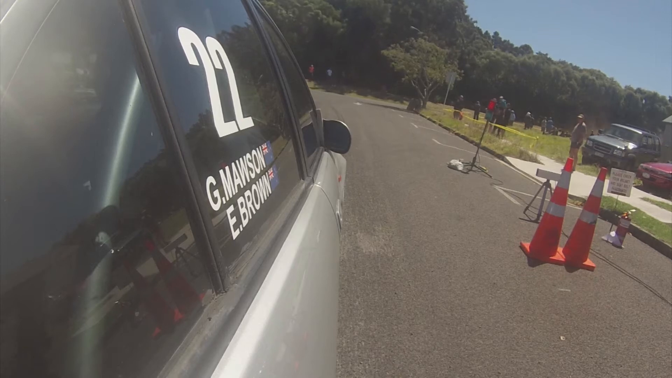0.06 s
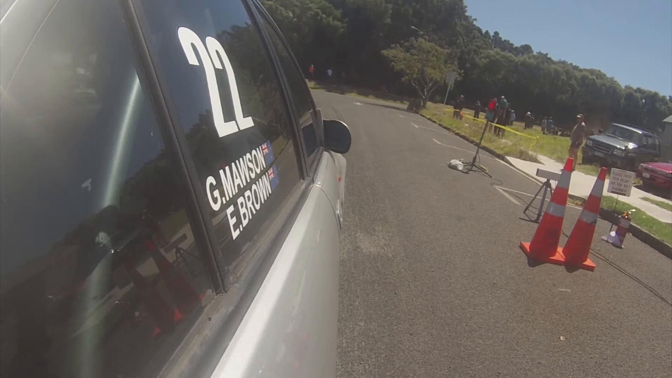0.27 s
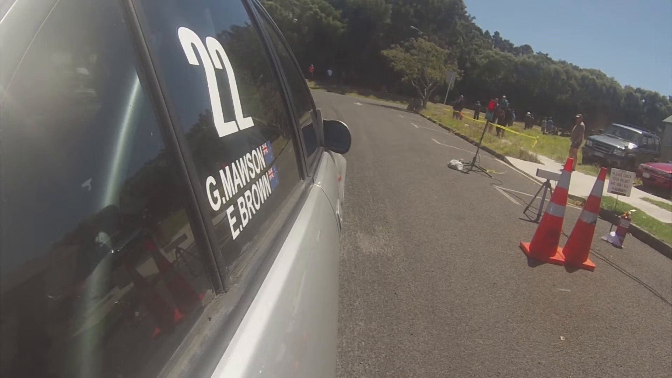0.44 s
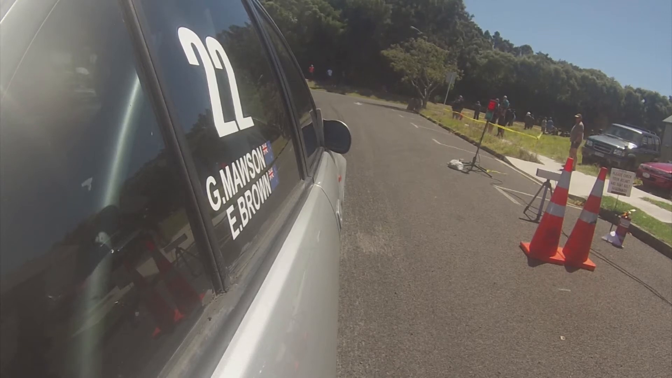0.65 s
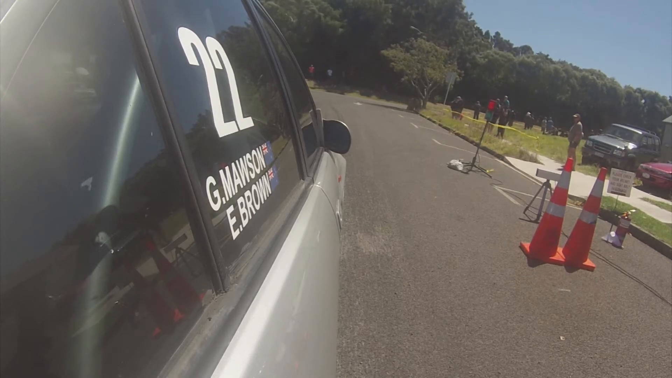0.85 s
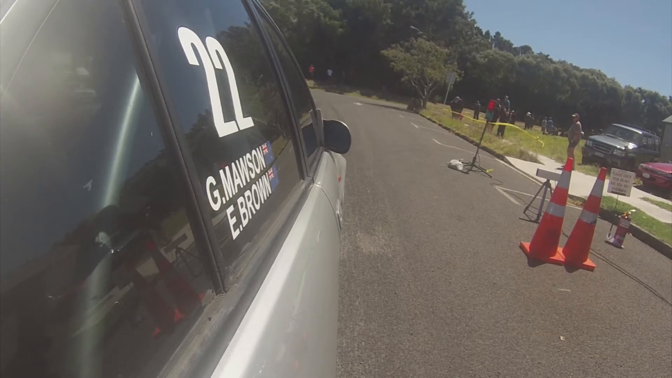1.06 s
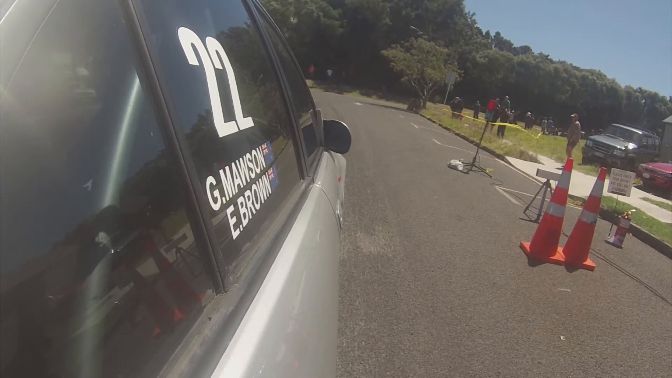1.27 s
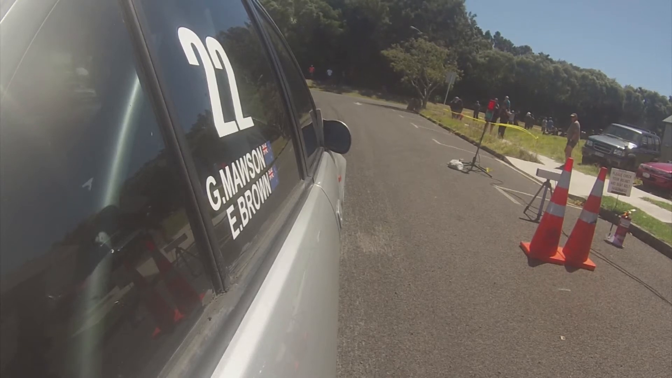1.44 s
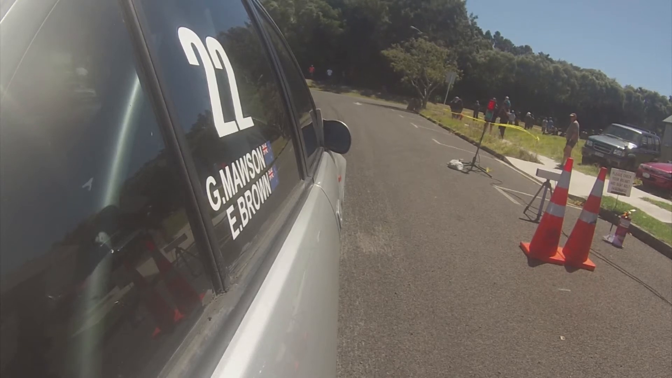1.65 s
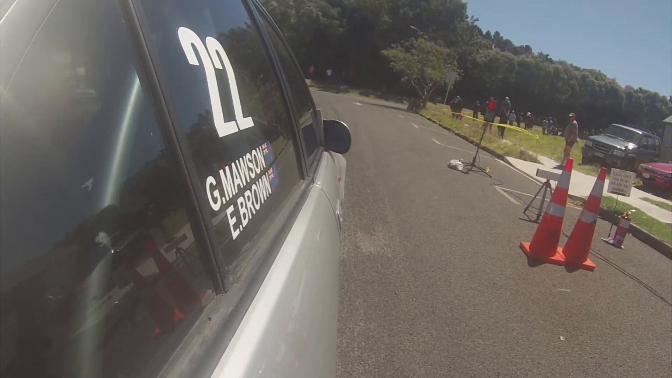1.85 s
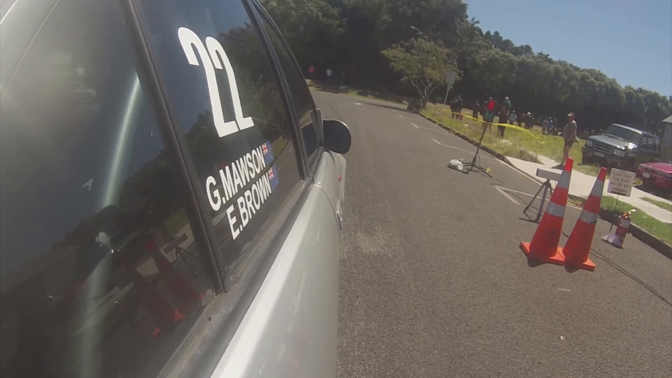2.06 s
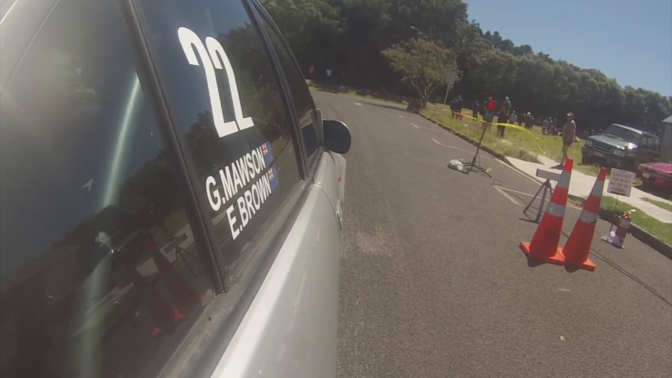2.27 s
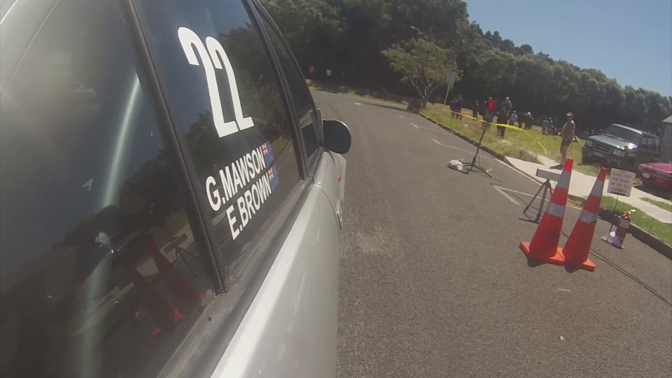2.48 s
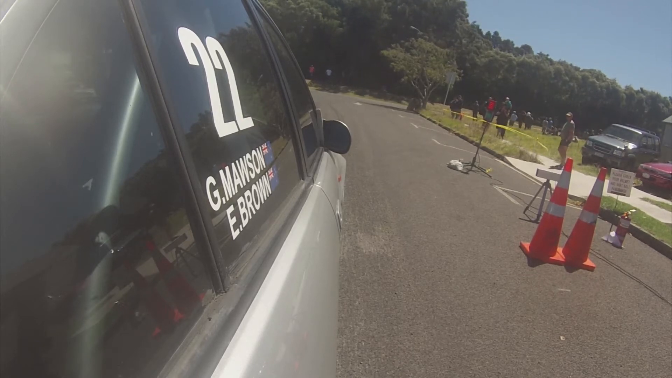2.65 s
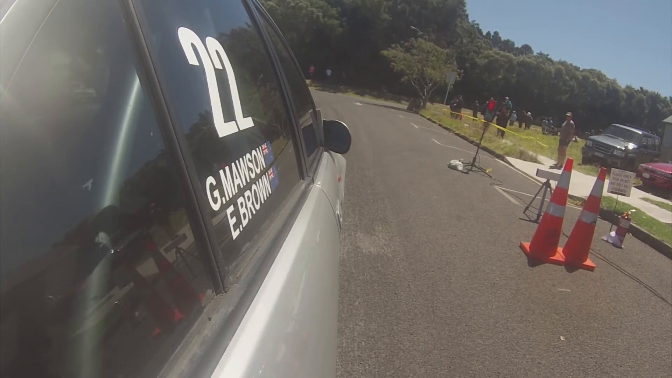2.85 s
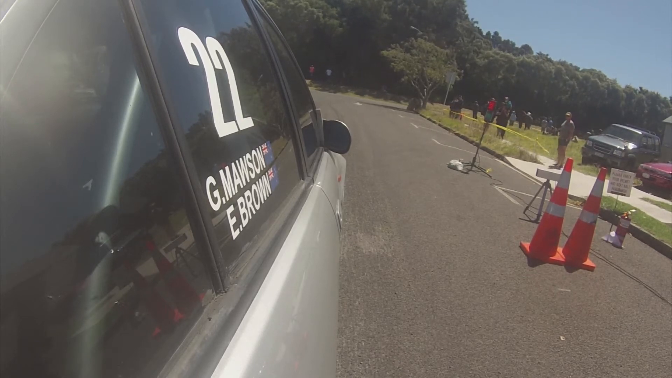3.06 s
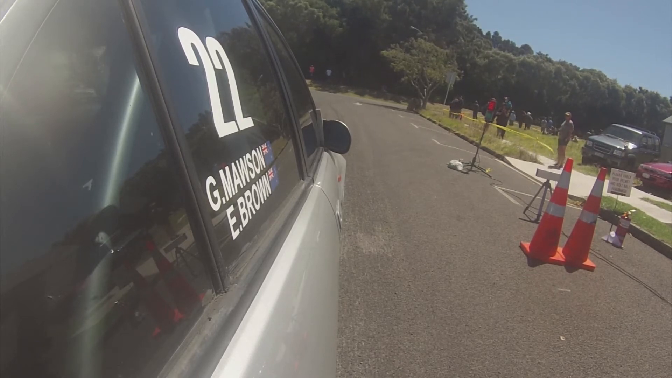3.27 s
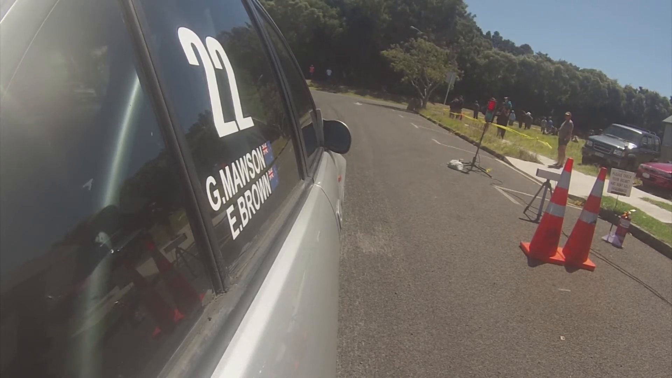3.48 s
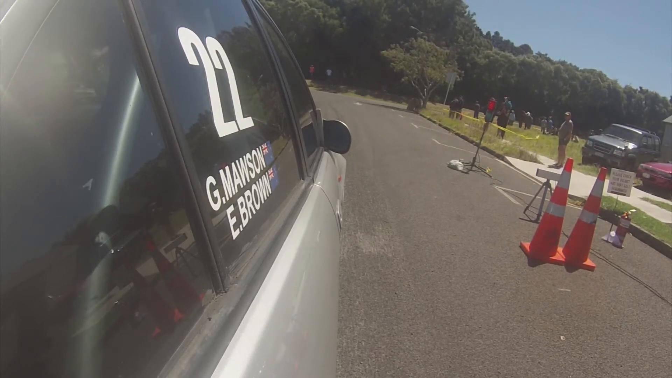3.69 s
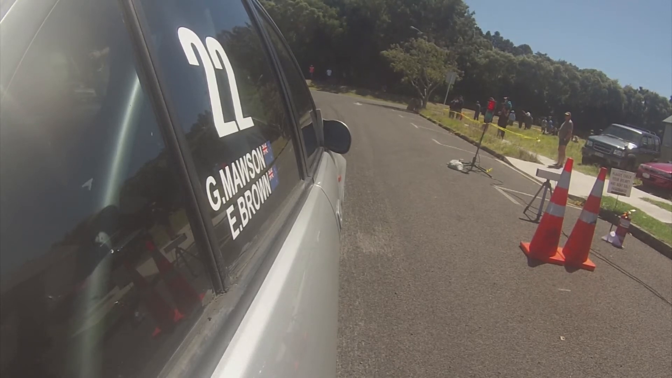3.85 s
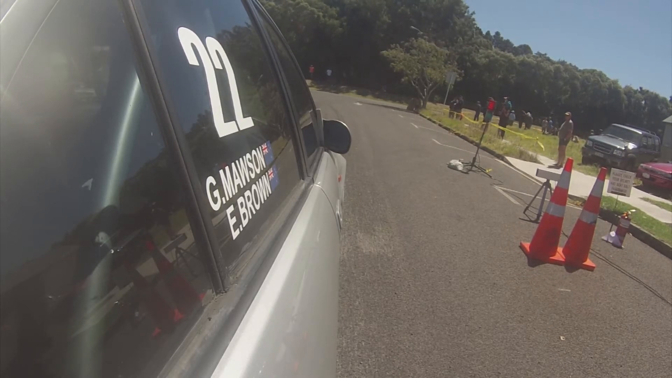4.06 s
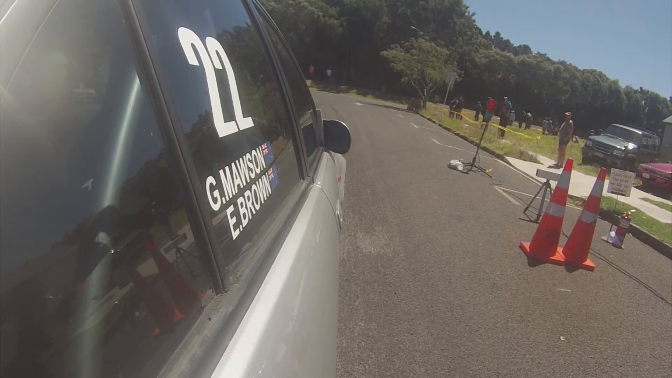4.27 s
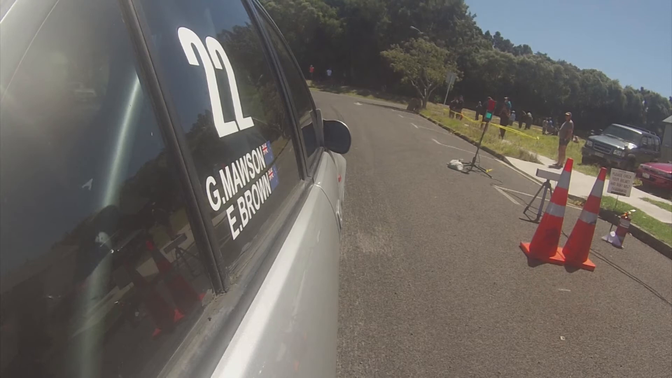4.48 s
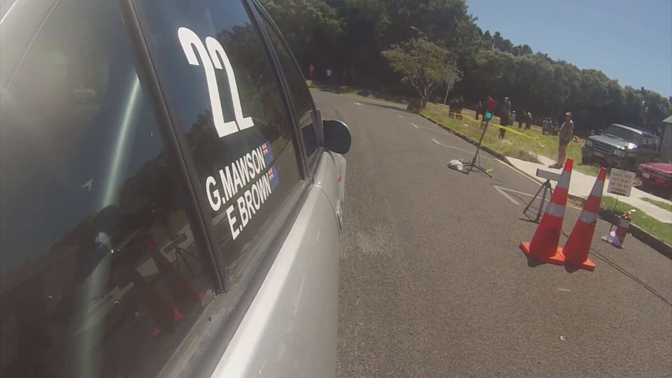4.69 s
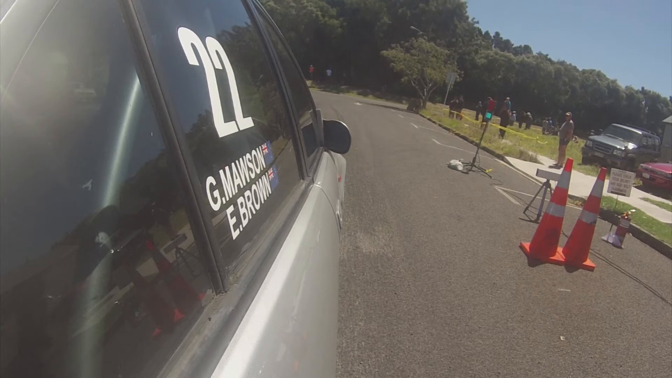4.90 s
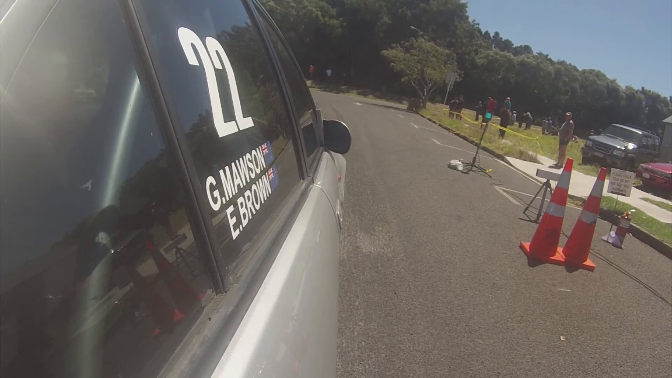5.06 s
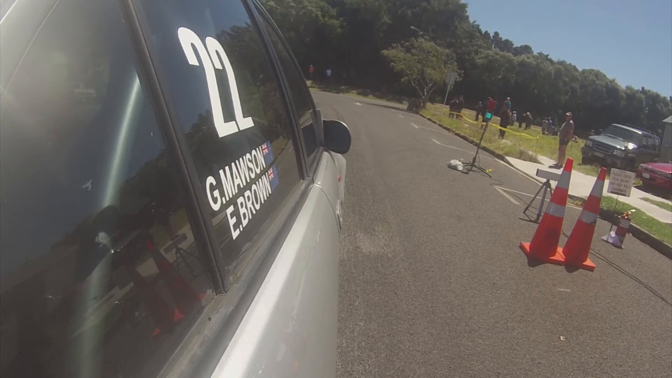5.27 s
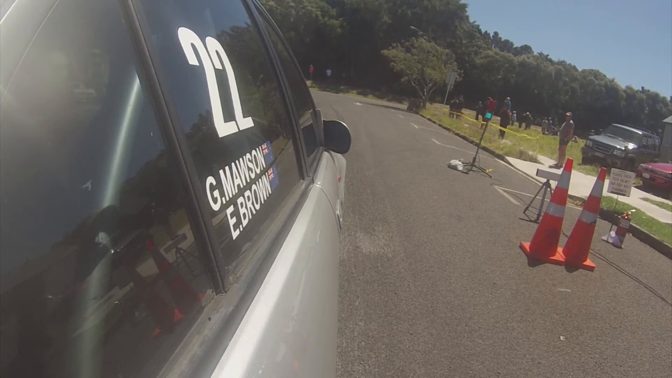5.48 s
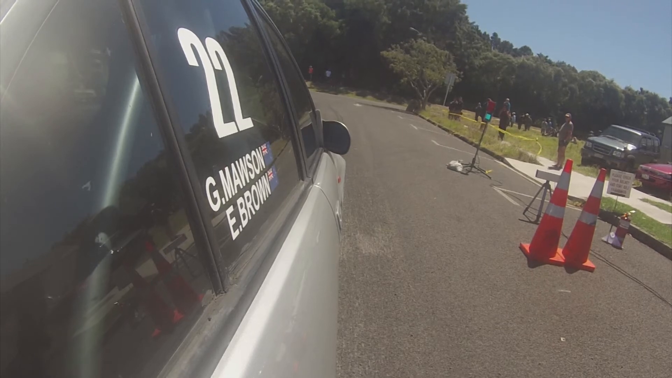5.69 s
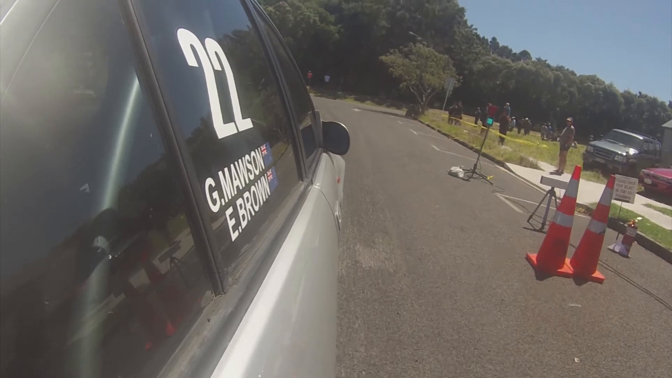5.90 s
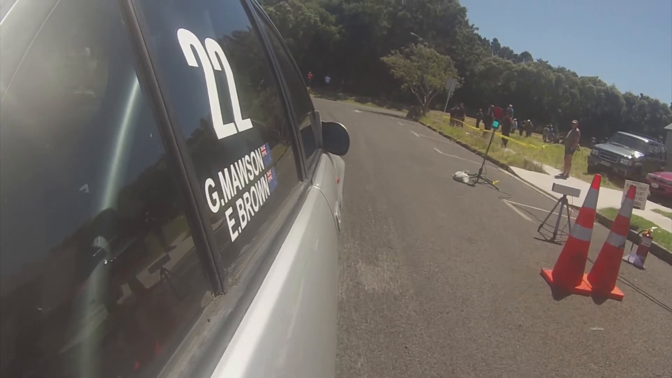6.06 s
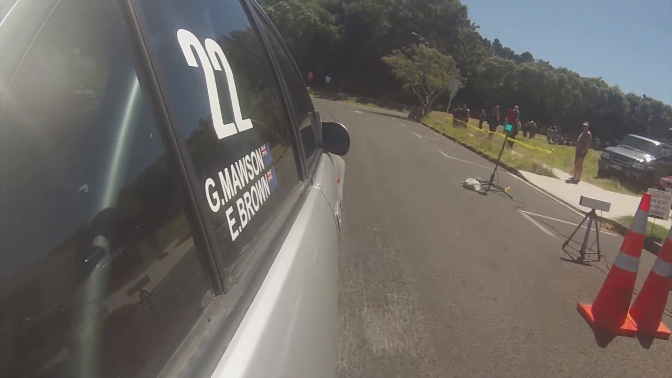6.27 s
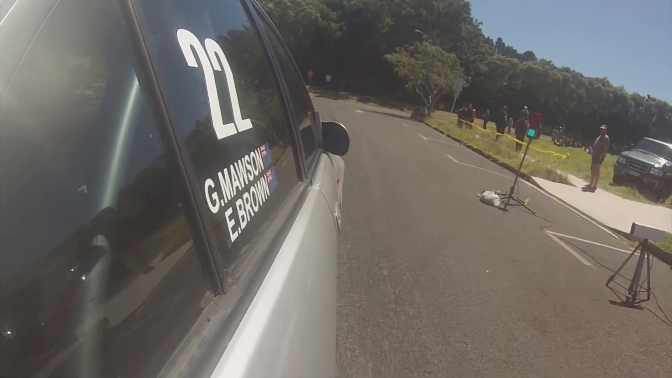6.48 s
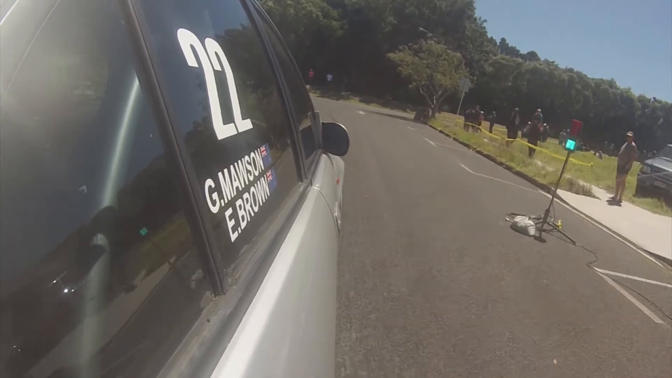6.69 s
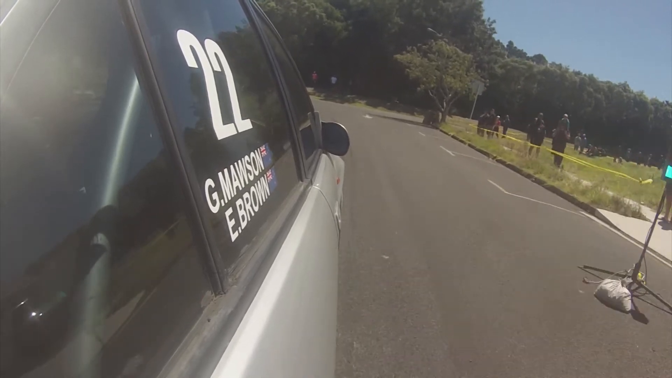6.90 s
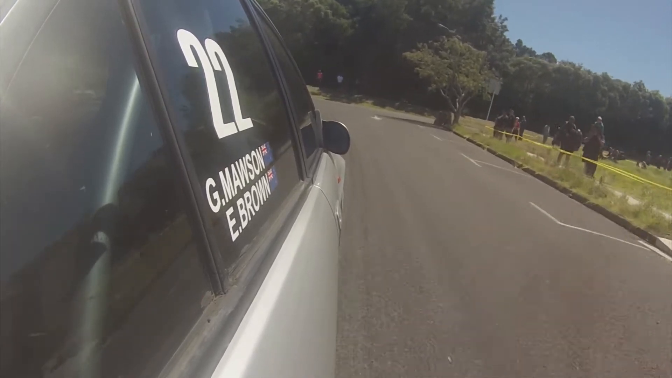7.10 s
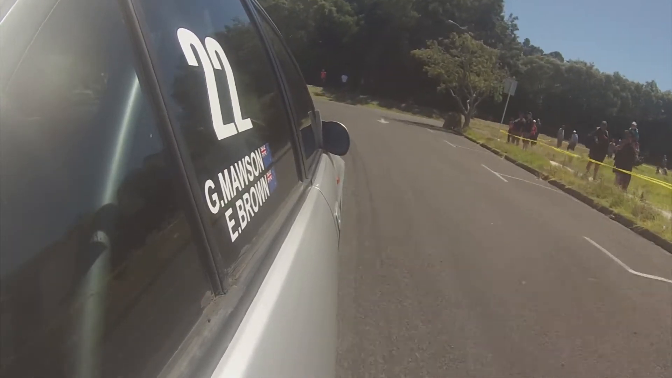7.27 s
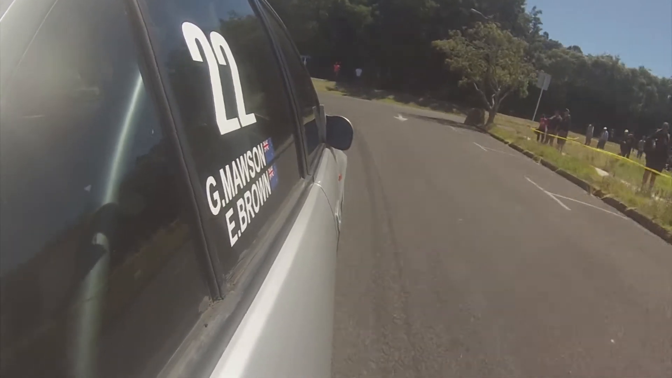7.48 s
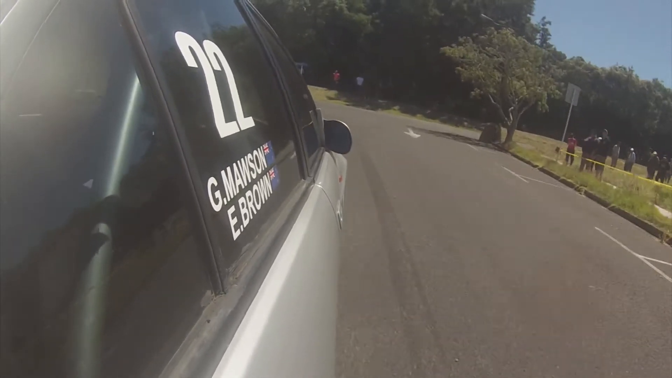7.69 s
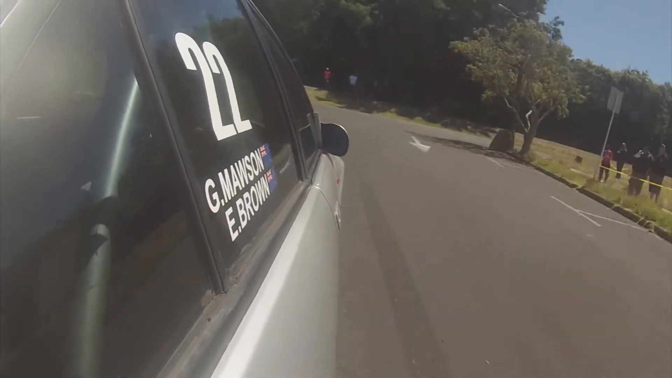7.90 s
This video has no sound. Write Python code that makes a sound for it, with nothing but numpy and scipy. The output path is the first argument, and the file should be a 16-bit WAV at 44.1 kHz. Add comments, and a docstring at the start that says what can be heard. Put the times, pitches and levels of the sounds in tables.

```python
"""A four-cylinder rally car engine revs in short bursts on the start line, then launches with wheelspin.
Its firings make a stack of tones, a dull exhaust roar and a clatter, heard through a sealed camera case
on the car's side. Grit strikes the bodywork and the slipping tyres rasp. Behind them, panels boom and
hum, the mount shakes and tyre noise builds, with one click, a faint whistle and a short hiss."""
import sys
import numpy as np
from scipy import signal
from scipy.fft import rfft, irfft
from scipy.io import wavfile

SR = 44100
rng = np.random.default_rng(int(sys.argv[2]) if len(sys.argv) > 2 else 0)


def digitize_waveform(pressure):
    """Quantize a signal to 16-bit integers and store it at the path in sys.argv[1].

    Rows of a 2-D input are taken as channels; values are limited to [-1, 1].
    """
    field = np.atleast_2d(pressure).T
    bounded = np.clip(field, -1, 1)
    quanta = np.round(bounded * 32767).astype(np.int16)
    wavfile.write(sys.argv[1], SR, quanta)


N = 350154
TIME = np.arange(N) / SR


def amp(db):
    """Turn decibels into a gain."""
    return 10 ** (np.asarray(db) / 20)

def rms_one(x):
    """Scale a signal to an average strength (rms) of 1."""
    return x / np.sqrt(np.mean(x ** 2) + 1e-20)

def in_time(rows):
    """Join a table's points with lines: one curve for each column after the time."""
    times, *columns = np.transpose(rows)
    return [np.interp(TIME, times, column) for column in columns]

def at_hz(points, hz):
    """Read a table's level at any frequency, on a scale of octaves."""
    freqs, levels = np.transpose(points)
    return np.interp(np.log(hz), np.log(freqs), levels)

def drift(rate):
    """A smooth random wobble of size about 1; a higher rate wobbles faster."""
    r = np.exp(-80 * np.pi * rate / SR)
    slow = signal.lfilter([1], [1, -2 * r, r * r], rng.standard_normal(N // 40 + 2002))[2000:]
    return np.interp(np.arange(N) / 40, np.arange(len(slow)), rms_one(slow))

def filtered(x, steepness, hz, kind):
    """Keep the lows, the highs or one band."""
    return signal.sosfilt(signal.butter(steepness, hz, kind, fs=SR, output="sos"), x)

def coloured_noise(spectrum, modes=(), swell=1):
    """Noise shaped by a spectrum, with ringing peaks (modes) on top."""
    noise = swell * rng.standard_normal(N)
    hz = np.maximum(np.fft.rfftfreq(N, 1 / SR), 1)
    inside = (hz > spectrum[0][0]) & (hz < spectrum[-1][0])
    peaks = 1 + sum(amp(2 * db) / (1 + (2 * (hz - top) / width) ** 2) ** 2 for top, width, db in modes)
    return rms_one(irfft(rfft(noise) * amp(at_hz(spectrum, hz)) * np.sqrt(peaks) * inside, N))

def resonant_noise(hz, width_hz):
    """Noise sent twice through a filter that rings at one pitch."""
    r = np.exp(-np.pi * width_hz / SR)
    feedback = [1, -2 * r * np.cos(2 * np.pi * hz / SR), r * r]
    once = signal.lfilter([1], feedback, rng.standard_normal(N + SR))
    return rms_one(signal.lfilter([1, -1], feedback, once)[SR:])

def wavering(hz, spread_hz, rate, flutter_db):
    """A tone whose pitch and level wander."""
    phase = 2 * np.pi * np.cumsum(hz + spread_hz * drift(rate)) / SR
    return np.sqrt(2) * amp(flutter_db * drift(rate)) * np.sin(phase + rng.uniform(0, 2 * np.pi))


# How the whistle comes and goes: t/s, level/dB
WHISTLE_LEVEL = [(4.45, -78), (4.57, -53.5), (4.75, -56), (4.87, -60), (4.97, -44), (5.08, -67),
                 (5.14, -80), (5.4, -70), (5.46, -48), (5.51, -43), (5.58, -46), (5.65, -75)]
def whistle():
    """A faint, unsteady whistle."""
    return amp(in_time(WHISTLE_LEVEL)[0]) * wavering(2026, spread_hz=5, rate=10, flutter_db=3.1)

# How the hiss comes and goes: t/s, level/dB
HISS_LEVEL = [(6.41, -100), (6.44, -62), (6.47, -61), (6.52, -61), (6.6, -100)]
def hiss():
    """A short, very high hiss that flickers."""
    return amp(in_time(HISS_LEVEL)[0] + 3 * drift(40)) * resonant_noise(12300, width_hz=1800)

def click(at_s=3.887, level_db=-20.5, sag_s=0.0076):
    """One dry click: a sudden step that sags back."""
    age = TIME - at_s
    return amp(level_db) * (age > 0) * np.exp(-np.maximum(age, 0) / sag_s)

# Tone colour of rolling tyres: f/Hz, level/dB
TYRE_COLOUR = [(500, -21), (750, -4.5), (1000, -2.5), (1400, -6), (2000, -15.5), (2700, -23.5),
               (6500, -39.5), (9000, -37.5)]
# Humps on that colour: f/Hz, width/Hz, level/dB
TYRE_HUMPS = [(941, 64, 5), (2137, 270, 17.4)]
# Tyre noise as the car gathers speed: t/s, level/dB
TYRE_LEVEL = [(5.6, -57), (6.1, -33.5), (6.8, -34), (7.3, -29), (7.46, -31.5), (7.54, -39), (7.7, -35),
              (7.94, -36)]
def rolling_tyres():
    """The tyres make a rushing noise that builds once the car rolls."""
    return amp(in_time(TYRE_LEVEL)[0] + 2 * drift(11)) * coloured_noise(TYRE_COLOUR, TYRE_HUMPS)

# Tone colour of the road rumble: f/Hz, level/dB
RUMBLE_COLOUR = [(20, -12), (40, -1), (90, -10.5), (130, -18.5), (200, -24)]
# How hard the mount shakes: t/s, level/dB
SHAKE_LEVEL = [(0.0, -47), (0.04, -48), (0.29, -30), (0.35, -33), (1.48, -37.5), (1.57, -27), (1.64, -38),
               (1.77, -33), (3.01, -43), (3.05, -39), (5.35, -52), (5.46, -38), (5.55, -56), (5.7, -32.5),
               (6.06, -26), (6.1, -22.5), (6.41, -22.5), (6.46, -19), (6.88, -18.5), (7.1, -25),
               (7.19, -17), (7.25, -28.5), (7.34, -9.5), (7.81, -13), (7.87, -14), (7.94, -14)]
def mount_shake():
    """Air and road rock the mount: a deep throb, with more rumble in it the harder it shakes."""
    shake_db, = in_time(SHAKE_LEVEL)
    rumble = amp(-1.5 + 0.17 * (shake_db + 16.5)) * coloured_noise(RUMBLE_COLOUR)
    gain = amp(shake_db - 2 + 1.1 * drift(9.3))
    return gain * (wavering(23.4, spread_hz=2.5, rate=8.2, flutter_db=1.5) + rumble)

# How hard the door booms: t/s, level/dB
BOOM_LEVEL = [(0.0, -42), (0.06, -23), (0.17, -39), (0.26, -18), (0.49, -36), (0.66, -18), (0.84, -33),
              (0.99, -22.5), (1.08, -20.5), (1.17, -50), (1.3, -23), (1.57, -36), (1.72, -24.5),
              (1.83, -33), (2.19, -26.5), (2.34, -37), (2.37, -41), (2.56, -25), (2.61, -34), (2.92, -19.5),
              (3.27, -43), (3.38, -24), (3.58, -37), (3.63, -23.5), (3.89, -30.5), (3.94, -21.5),
              (4.11, -58), (4.27, -43), (4.31, -53), (4.47, -22.5), (4.6, -22), (4.8, -30), (4.87, -28),
              (5.22, -36), (5.26, -20.5), (5.35, -21), (5.53, -38), (5.79, -30), (5.86, -36), (6.41, -14),
              (6.57, -25.5), (6.68, -13), (6.9, -18.5), (6.96, -40), (7.03, -7.5), (7.25, -27.5),
              (7.32, -8.5), (7.43, -14), (7.5, -7.5), (7.54, -15), (7.67, -7.5), (7.78, -23.5),
              (7.87, -7.5), (7.94, -43)]
def door_boom():
    """The door panel booms on its lowest note."""
    return amp(in_time(BOOM_LEVEL)[0] - 0.6) * wavering(67.4, spread_hz=2.3, rate=9.5, flutter_db=2.5)

# Two humming panels: t/s, lower note level/dB, upper note level/dB
HUM_LEVELS = [(0.0, -40, -49), (0.35, -32, -50), (0.6, -46.5, -57), (1.0, -34, -36.5), (1.3, -43, -48),
              (1.6, -40, -53), (2.0, -39.5, -58), (2.3, -37.5, -50), (3.0, -44, -42), (3.5, -40, -46.5),
              (4.0, -45, -49), (4.5, -41, -44), (5.0, -43, -46), (5.15, -34, -25.5), (5.35, -29, -30.5),
              (5.5, -38, -28), (5.65, -31.5, -25), (5.9, -40, -22.5), (6.1, -43, -39), (7.25, -35, -31),
              (7.38, -25, -43), (7.48, -17.5, -33), (7.53, -48, -41.5), (7.94, -38, -42)]
def panel_hums(notes_hz=(180.9, 267.2)):
    """Each body panel hums on its own note, whatever the engine speed."""
    return sum(amp(db) * wavering(hz, spread_hz=3.55, rate=7.86, flutter_db=1.5)
               for hz, db in zip(notes_hz, in_time(HUM_LEVELS)))

# Noise bands of slipping tyres: f/Hz, width/Hz, level/dB
SLIP_BANDS = [(1574, 110, 2), (2120, 280, -25), (2586, 210, -6), (4634, 1000, -11), (7100, 1100, -19.5)]
def wheelspin(start_s=6.47, end_s=6.98):
    """The tread slips in bursts, making a rasp that fades in and out."""
    spin = np.clip((TIME - start_s) / 0.1, 0, 1) * np.clip((end_s - TIME) / 0.18, 0, 1)
    rasp = sum(amp(db) * resonant_noise(hz, width_hz) for hz, width_hz, db in SLIP_BANDS)
    return spin * amp(-35 + 2.9 * drift(30)) * rasp

# Pitches at which the sealed case rings: f/Hz, width/Hz, level/dB
CASE_RINGS = [(1282, 180, 12.6), (1462, 138, 18.1), (1571, 134, 14.2), (2198, 370, 10.3), (2422, 134, 14.2),
              (2565, 120, 12.8), (3070, 220, 4.7), (3600, 230, 1.2), (4153, 140, 7.4), (4410, 130, 0.83),
              (6720, 500, 4), (7850, 1300, 2), (11100, 1000, 2.8)]
def case_knocks(rattle):
    """A rattle sets off short, broad rings in the case; the lower ones are kept."""
    knocks = 0
    for k, (hz, width_hz, db) in enumerate(CASE_RINGS):
        r = np.exp(-np.pi * 1.3 * width_hz / SR)
        feedback = [1, -2 * r * np.cos(2 * np.pi * hz / SR), r * r]
        ring = signal.lfilter([1, 0, -1], feedback, rattle) * (1 - r * r) / 2
        knocks += (-1) ** k * amp(db - 10.5) * ring
    return filtered(knocks, 3, [1200, 2700], "band")

# Knocks on the panel, stones once the car moves:
# t/s, rattle level/dB, tick level/dB, ring f/Hz, ring level/dB
PANEL_HITS = [(0.271, -27, -58, 1540, -34), (0.39, -29, -62, 2350, -39), (1.53, -28, -62, 2400, -44),
              (1.551, -31, -62, 2537, -44), (1.67, -26, -60, 1552, -39), (6.526, -9.5, -54, 2200, -27),
              (6.697, -7, -54, 2322, -30), (6.754, -4, -40, 2641, -8), (6.885, -26, -44, 2283, -36),
              (6.946, -9, -54, 2455, -9.5), (6.99, -24, -50, 2600, -20), (7.029, -10.5, -43, 2048, -25),
              (7.066, -19, -46, 2206, -23), (7.147, -11, -63, 2130, -24), (7.292, -0.5, -35, 2165, -8),
              (7.409, -24, -66, 2543, -19.5), (7.43, -26, -56, 2300, -27), (7.456, -10, -45, 2250, -30),
              (7.495, -25, -47, 2257, -30), (7.516, -32, -53, 2172, -35), (7.59, -27, -53, 2195, -27),
              (7.661, -14, -44, 2216, -38), (7.671, -25, -50, 2150, -30), (7.701, -19, -52, 2300, -26),
              (7.817, -10.5, -50, 2350, -31), (7.859, -20, -49, 2295, -32)]
def grit(small_stones=90, spray_s=(6.5, 7.92), tick_s=0.013, ring_s=0.028):
    """Each hit makes a bright tick, rings three close panel notes and rattles the case."""
    hit_samples = 3000
    t = np.arange(hit_samples) / SR
    rattle, ticks, rings = np.full((3, N + hit_samples), 1e-18)
    spray = [(rng.uniform(*spray_s), rng.normal(-28, 5), rng.normal(-62, 6.2),
              rng.uniform(1500, 2600), rng.normal(-33, 3)) for _ in range(small_stones)]
    rise, ring_rise = np.minimum(t / 0.00024, 1), np.minimum(t / 0.0012, 1)
    for at_s, rattle_db, tick_db, ring_hz, ring_db in PANEL_HITS + spray:
        hit = round(at_s * SR) + np.arange(hit_samples)
        noise = rng.standard_normal((2, hit_samples))
        rattle_s = max(23 + 2 * rattle_db, 4) / 1000   # harder hits rattle longer
        rattle[hit] += rise * amp(rattle_db) * np.exp(-(t / rattle_s) ** 2) * noise[0]
        ticks[hit] += rise * amp(tick_db - 60 * t / tick_s) * noise[1]
        notes_hz = ring_hz * (1 + 0.045 * rng.normal([-1, 0, 1], 0.38))
        notes = np.sin(2 * np.pi * np.outer(notes_hz, t) + rng.uniform(0, 6.2, (3, 1)))
        rings[hit] += 0.73 * ring_rise * amp(ring_db - 60 * t / ring_s) * notes.sum(axis=0)
    return (case_knocks(rattle) + rings + amp(9.5) * filtered(ticks, 2, [3500, 10500], "band"))[:N]

# Dull tone colour of the sealed case: f/Hz, level/dB
CASE_COLOUR = [(700, -5.5), (1100, -14.5), (1800, -10.5), (2800, -20.5), (3800, -25.5), (5500, -30),
               (8600, -42), (9500, -44.5), (15000, -55)]
def clatter(swell, middle_db, treble_db, split_hz=3300):
    """Engine clatter swells on each firing and rings the case."""
    noise = coloured_noise(CASE_COLOUR, CASE_RINGS, swell)
    middle, treble = (rms_one(filtered(noise, 4, split_hz, kind)) for kind in ("low", "high"))
    return amp(middle_db + 4.5 + drift(10)) * middle + amp(treble_db + 5.5 + 0.8 * drift(25)) * treble

# Tone colour of the exhaust roar: f/Hz, level/dB
ROAR_COLOUR = [(40, -27.5), (100, -7), (140, -17.5), (168, 1.5), (200, -2), (270, -2.5), (325, 3),
               (420, -16.5), (490, -21.5), (570, -9.5), (700, -20.5), (1000, -19.5), (1300, -40)]
# Panels that the roar rings: f/Hz, width/Hz, level/dB
ROAR_RINGS = [(180, 55, 1.5), (271.4, 12, 2.5)]
ROAR_BASE_DB, ROAR_BOOST_DB = -39.5, 9.5
def exhaust_roar(swell, roar_db):
    """Dull exhaust noise swells on each firing and rings the panels."""
    return amp(roar_db + ROAR_BOOST_DB) * coloured_noise(ROAR_COLOUR, ROAR_RINGS, swell)

# Quick presses of the pedal: peak t/s, rise time/s, load level/dB
PEDAL_BLIPS = [(0.5, 0.15, -26.5), (1.14, 0.31, -45), (1.88, 0.23, -36.5), (2.66, 0.34, -31.5),
               (3.44, 0.37, -36.5), (4.38, 0.37, -35), (5.12, 0.33, -25.5)]
# Waiting, then launching: t/s, then level/dB of load, roar, clatter middle and clatter treble
WAIT_AND_LAUNCH = [(0.05, -48.5, -52, -55, -57), (0.2, -49, -56.5, -52, -56),
                   (0.35, -49.5, -51.5, -51.5, -56.5), (0.5, -50, -53, -50, -57),
                   (1.45, -50, -58, -53.5, -57.5), (1.6, -50, -58, -51, -58),
                   (1.75, -50, -59, -52.5, -57.5), (3.4, -50, -58, -52, -57), (4.9, -50, -58, -52.5, -57.5),
                   (5.12, -42, -46, -47, -55.5), (5.3, -24.5, -49.5, -49.5, -52.5),
                   (5.43, -25, -37, -46.5, -53), (5.6, -43.5, -33, -38, -49), (5.75, -27.5, -32, -39, -47),
                   (6.08, -18, -29, -42.5, -50.5), (6.33, -15.5, -29.5, -38, -49),
                   (6.42, -34, -33.5, -47, -51.5), (6.55, -13.5, -28, -30, -46.5),
                   (6.69, -21, -29, -29, -44.5), (6.82, -24.5, -35, -31.5, -46),
                   (7.1, -20.5, -34.5, -44.5, -51), (7.28, -19, -29.5, -35.5, -45),
                   (7.4, -28, -32.5, -41.5, -52), (7.49, -32, -33, -50, -49), (7.52, -52, -47, -54, -69),
                   (7.57, -49, -35.5, -49, -56), (7.66, -18, -42.5, -45, -53),
                   (7.78, -24.5, -38, -44, -52.5), (7.9, -29, -36.5, -48, -52.5)]
COAST_DB, MID_LOAD_DB = -48, -30   # load with the pedal up, and at medium effort
def throttle(shut_s=0.2):
    """Pressing the pedal raises the load (how hard the engine works) and the roar."""
    pull_db, roar_db, middle_db, treble_db = in_time(WAIT_AND_LAUNCH)
    blip_db = np.max([np.interp(TIME, [s - rise, s, s + shut_s], [COAST_DB, db, COAST_DB])
                      for s, rise, db in PEDAL_BLIPS], axis=0)
    blip_roar_db = ROAR_BASE_DB + 0.84 * (blip_db - MID_LOAD_DB)
    return np.maximum(blip_db, pull_db), np.maximum(roar_db, blip_roar_db), middle_db, treble_db

def engine_tone(phase, rough, order, db, flutter_db):
    """A tone at `order` times the firing rate; it flutters because no two firings are alike."""
    wander = rough * (0.05 + 0.025 * order ** 2) * drift(8)
    gain = amp(db + rough * flutter_db * drift(22) + 2.8 * (order > 2) * drift(4.9))
    return np.sqrt(2) * gain * np.sin(order * phase + rng.uniform(0, 2 * np.pi) + wander)

# Extra engine tones: multiple of the firing rate, relative level/dB, share due to uneven cylinders
SIDE_TONES = [(.5, -9.5, 0.034), (1.75, -1, 0.81), (2.25, -14.5, 0.55), (2.5, -2.5, 0.017),
              (2.75, -9.5, 0.53), (3, 3, 0.24), (3.25, -9, 0.1), (3.5, -1, 0.18), (3.75, -4.5, 0.1),
              (4, 0.5, 0.056), (4.25, -11.5, 0.079), (4.5, -4, 0.12), (4.75, -7, 0.1), (5, -3.5, 0.033),
              (5.5, -8, 0.05), (6, -6, 0.045)]
# How well the bodywork passes them to the case: f/Hz, level/dB
BODY_COLOUR = [(30, -17.5), (67, 8), (130, -15), (168, 0), (195, -5.5), (240, 14.5), (270, 1), (295, 3),
               (330, -3.5), (410, -19.5), (490, -15), (570, -13), (700, -21), (790, -17.5), (900, -14),
               (1000, -15), (1150, -21), (1350, -20)]
def side_tones(phase, rough, hz, load_db, roar_db):
    """Low tones follow the load, high ones the roar; cylinders fire less evenly at light load."""
    uneven_db = -9.5 - 0.53 * (load_db - MID_LOAD_DB) + 5.5 * drift(1.9)
    sink_db = 0.29 * np.maximum(roar_db - ROAR_BASE_DB, 0)   # high tones sink into a loud roar
    high_db = np.minimum(roar_db + ROAR_BOOST_DB - sink_db, load_db + 4)
    tones = 0
    for order, db, share in SIDE_TONES:
        drive_db = load_db if order < 3 else high_db
        level_db = drive_db + db + share * uneven_db + at_hz(BODY_COLOUR, order * hz)
        tones += engine_tone(phase, rough, order, level_db, flutter_db=3.5)
    return tones

# The tone at 0.75 times the firing rate, at medium load: firing f/Hz, level/dB
LOW_TONE = [(81, -35), (107, -31), (111, -29.5), (138, -40.5), (152, -33), (163.4, -40), (183, -32),
            (191, -40.5), (206.5, -36), (213.2, -19), (225, -11)]
# The tone at 1.25 times the firing rate, strong when the car pulls: t/s, level/dB
PULL_TONE = [(0.0, -43), (0.3, -44.5), (0.6, -44), (2.0, -46.5), (4.9, -42.5), (5.4, -48), (5.66, -30.5),
             (5.9, -30), (6.0, -14), (6.07, -15), (6.12, -37.5), (6.3, -35), (6.36, -30), (6.45, -24),
             (7.04, -40.5), (7.23, -32), (7.48, -31), (7.56, -40), (7.68, -26.5), (7.8, -23), (7.94, -28.5)]
# Engine speed: t/s, firing f/Hz, then level/dB of the tones at 1, 2 and 1.5 times that rate
ENGINE_REVS = [(0.0, 81.4, -17.5, -34, -46), (0.19, 83.7, -20, -31.5, -45), (0.33, 84.7, -17.5, -28, -48),
               (0.4, 95, -23, -25, -40), (0.44, 99.4, -19.5, -25, -41), (0.5, 116.3, -29, -24.5, -40),
               (0.58, 128.4, -30, -19.5, -35), (0.62, 131.7, -21, -23, -42), (0.9, 117.9, -31, -34, -40),
               (1.09, 117.1, -34, -29.5, -41), (1.23, 121.6, -30, -28.5, -40), (1.5, 105, -29, -42, -39),
               (1.65, 105.5, -27, -36.5, -43), (1.79, 107.4, -28.5, -42, -42),
               (1.86, 109.8, -26, -24.5, -48), (1.96, 117.9, -40, -34.5, -50),
               (2.02, 114.8, -29.5, -33, -40), (2.09, 113.3, -27, -38.5, -44.5),
               (2.44, 100.5, -27, -38.5, -39), (2.71, 127.3, -30.5, -17.5, -44),
               (2.78, 127.9, -25, -30, -43), (2.82, 123.4, -33, -25, -43), (2.94, 117.7, -28, -35, -50),
               (3.22, 108.8, -32, -36, -57), (3.36, 113.2, -28, -30.5, -37), (3.55, 125.8, -35.5, -20, -49),
               (3.7, 120, -26, -36.5, -36), (3.84, 109.9, -32.5, -36, -43), (3.97, 108.1, -25, -42.5, -33),
               (4.07, 104.4, -26, -30.5, -47), (4.11, 101.2, -27, -36, -53),
               (4.41, 125.9, -33.5, -20.5, -47), (4.55, 121.6, -27, -35.5, -48),
               (4.82, 106.3, -28.5, -39.5, -39.5), (4.91, 99, -23, -32.5, -42),
               (5.01, 123, -28.5, -21, -31), (5.18, 156.6, -19, -24, -43), (5.28, 161.4, -30.5, -35, -37),
               (5.39, 165.5, -19, -40, -24), (5.41, 164.2, -24, -23, -39), (5.45, 173.0, -24, -26, -29),
               (5.54, 192.6, -20, -36, -34), (5.66, 218, -33, -38, -27), (5.7, 223.3, -20, -32, -45),
               (5.78, 225.1, -20, -32.5, -42), (5.95, 200.5, -27.5, -51, -20.5),
               (5.99, 197.4, -11, -26, -31), (6.08, 187.1, -21.5, -35, -39),
               (6.23, 179.1, -11.5, -20.5, -32), (6.27, 178.9, -17, -36, -30), (6.29, 177.3, -14, -19, -37),
               (6.35, 166.2, -9.5, -13.5, -36), (6.37, 164.1, -3.5, -21.5, -35),
               (6.41, 166.4, -15.5, -29.5, -27.5), (7.04, 165.3, -22, -22, -22),
               (7.14, 173, -29.5, -32, -25), (7.23, 178.3, -12.5, -19, -25.5),
               (7.42, 189.1, -33, -36.5, -38), (7.5, 196.1, -25, -39, -39), (7.56, 166, -45, -44, -43),
               (7.68, 168.1, -35, -31.5, -41), (7.8, 175.5, -24, -59, -26.5), (7.94, 174.4, -28, -56, -35)]
def engine():
    """Four cylinders fire in turn, making tones that rise with the revs, plus roar and clatter."""
    hz, firing_db, octave_db, between_db = in_time(ENGINE_REVS)
    load_db, roar_db, middle_db, treble_db = throttle()
    phase = 2 * np.pi * np.cumsum(hz * (1 + 0.006 * drift(9))) / SR   # one cycle per firing
    rough = np.interp(load_db, [-44, -26], [1.05, 0.8])   # more flutter at light load
    low_db = np.interp(hz, *np.transpose(LOW_TONE)) + 0.45 * (load_db - MID_LOAD_DB)
    pull_db, = in_time(PULL_TONE)
    tones = side_tones(phase, rough, hz, load_db, roar_db)
    for order, db, flutter_db in [(0.75, low_db, 2), (1, firing_db, 2.7), (1.25, pull_db, 2),
                                  (1.5, between_db, 2.8), (2, octave_db, 3)]:
        tones += engine_tone(phase, rough, order, db, flutter_db)
    crank_turns = phase / (4 * np.pi)   # two firings a turn; each turn burns with its own strength
    strength_db = 1.3 * np.interp(crank_turns, np.arange(N // 200), rng.standard_normal(N // 200))
    swell = 1 + 0.049 * np.cos(phase) + 0.094 * np.cos(phase / 2)
    return amp(strength_db) * tones + exhaust_roar(swell, roar_db) + clatter(swell, middle_db, treble_db)


def scene():
    """Everything heard inside the case, in one channel."""
    background = whistle() + hiss() + click() + rolling_tyres()
    bodywork = mount_shake() + door_boom() + panel_hums()
    return (background + bodywork + wheelspin() + grit() + engine())[None]

def record(dry, cutoff_hz=16300):
    """Round off the loudest peaks and cut the highest treble."""
    rounded = 0.87 * np.tanh(dry / 1.07)
    return signal.sosfilt(signal.cheby2(10, 60, cutoff_hz, fs=SR, output="sos"), rounded)


dry = scene()
out = record(dry)
digitize_waveform(out)
```